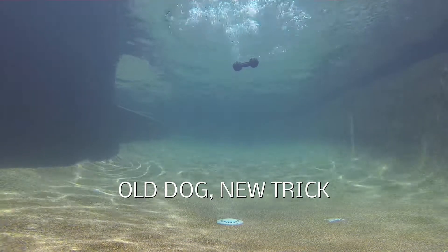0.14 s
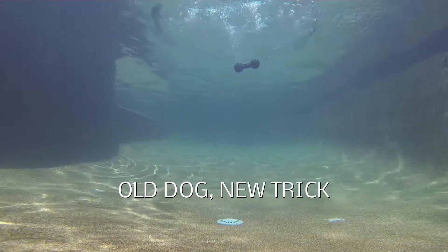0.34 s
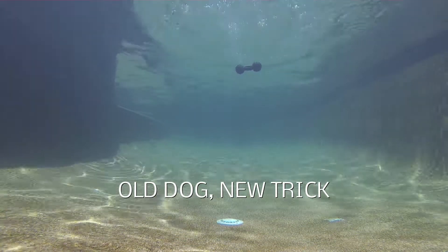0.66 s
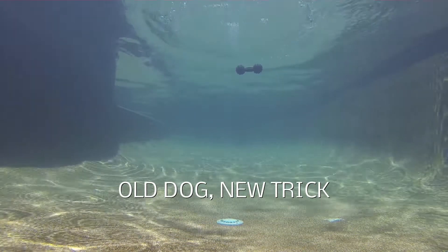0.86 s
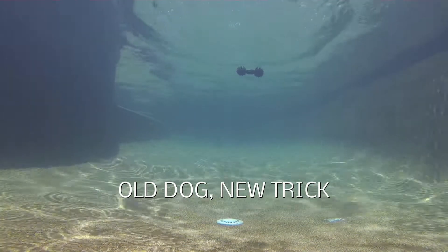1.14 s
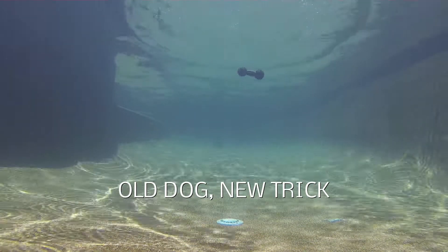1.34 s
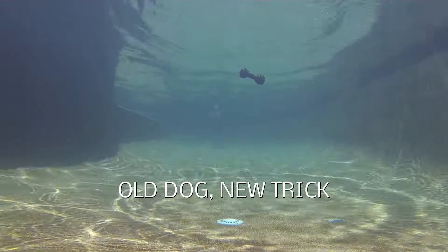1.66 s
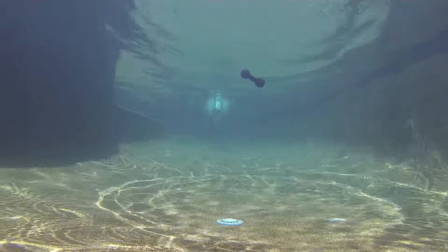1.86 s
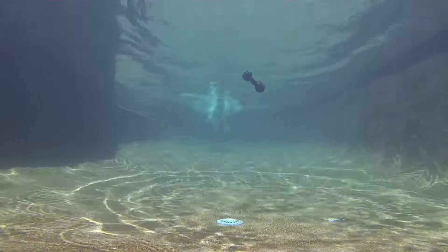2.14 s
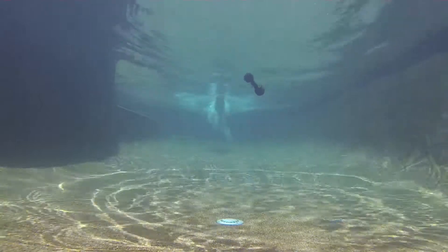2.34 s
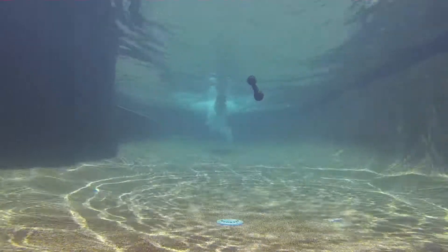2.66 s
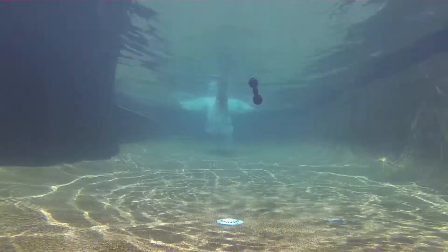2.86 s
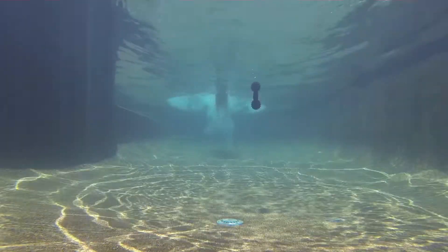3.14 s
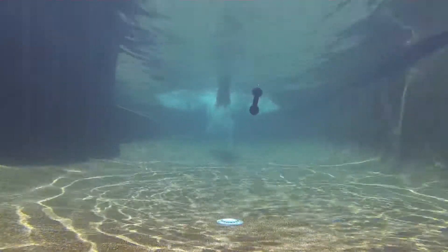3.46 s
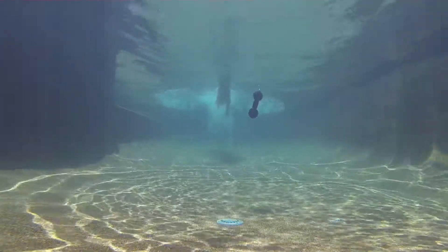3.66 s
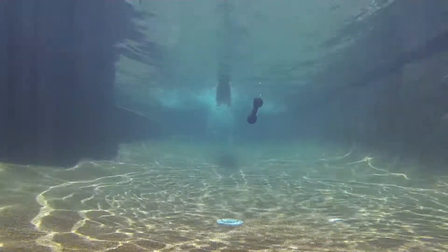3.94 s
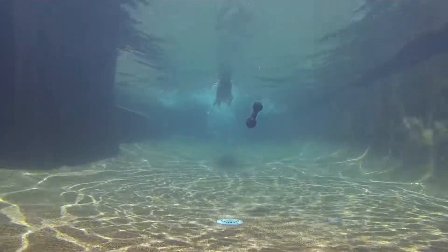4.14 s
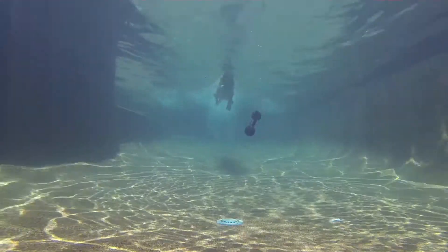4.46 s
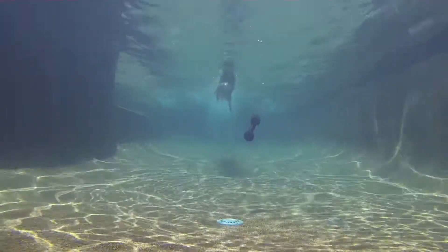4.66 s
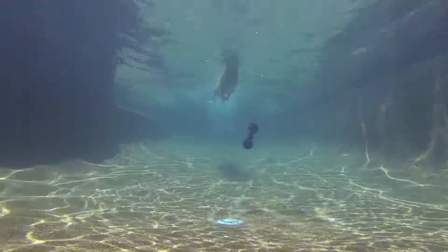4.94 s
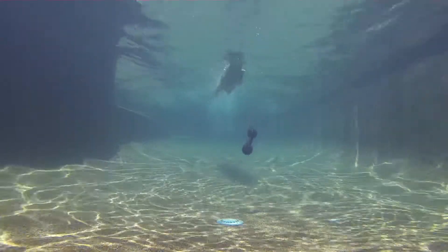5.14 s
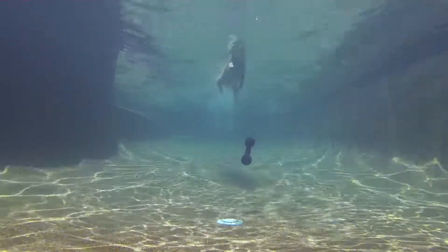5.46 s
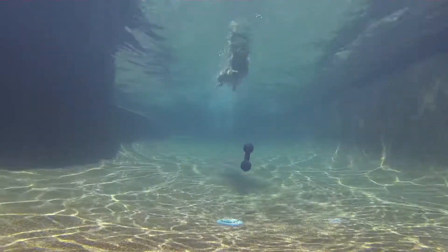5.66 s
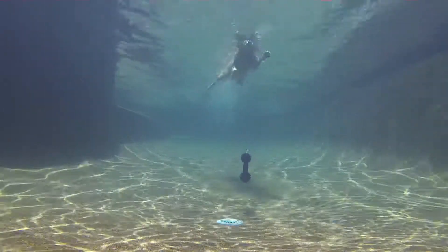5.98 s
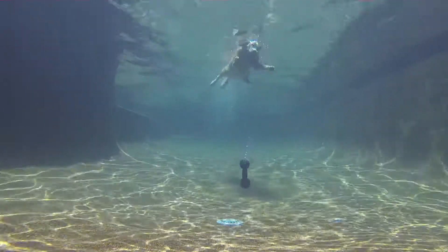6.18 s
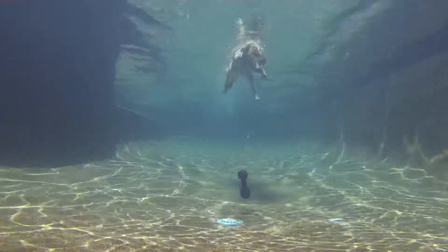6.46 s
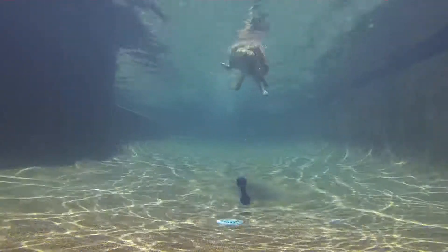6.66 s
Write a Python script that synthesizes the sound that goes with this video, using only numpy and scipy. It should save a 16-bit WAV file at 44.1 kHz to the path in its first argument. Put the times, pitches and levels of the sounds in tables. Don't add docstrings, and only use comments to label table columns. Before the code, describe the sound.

Underwater, a sinking toy lets out hollow glugs, then a dog plunges in with deep thumps, dense gurgling, and paddling bubbles that gradually thin out.

```python
import sys
import numpy as np
from scipy import signal
from scipy.fft import rfft, irfft
from scipy.io import wavfile

SR = 44100
rng = np.random.default_rng(int(sys.argv[2]) if len(sys.argv) > 2 else 0)


def store_wav(level_fs):
    pcm = np.round(np.clip(np.atleast_2d(level_fs), -1, 1) * 32767)
    wavfile.write(sys.argv[1], SR, pcm.T.astype(np.int16))


def amplitude_ratio(level_db):
    exponent = np.asarray(level_db, float) / 20
    return 10 ** exponent


N = 300321

# centre_hz, width_hz, level_db
HOUSING_MODES = [(544, 217, 0.5), (640, 121, 5.5), (751, 94, -4), (840, 78, -8), (1120, 340, -15),
                 (1660, 207, -0.5), (1820, 276, -7), (2350, 480, -16.5), (2850, 434, -17), (3400, 530, -18),
                 (4340, 960, -30.5), (5076, 660, -33), (6050, 1480, -38.5), (8240, 1000, -40.5),
                 (9420, 1040, -46), (11900, 8000, -50)]
SHELL_RING_HZ, SHELL_RING_WIDTH_HZ = 665, 76.5

# pitch_hz, density_db (per Hz)
HISS_COLOUR = [(239, -43), (378, -16), (683, -9.5), (1410, -14), (1700, -14.5), (9260, -28), (10900, -33),
               (15400, -29)]
# centre_hz, width_hz, boost_db
HISS_HUMPS = [(3254, 240, 13.5), (5280, 360, 10), (12900, 1000, 9), (10970, 280, 10.5)]
# pitch_hz, rms_db
WHINE_TONES = [(10643, -82), (10691, -89), (10740, -93), (10788, -95), (10837, -94), (13189, -89)]
HISS_DB = -68

# top_s (when the top is reached), slow_db, quick_db, hold_s
SURGES = [
    (0.0, -57.5, -47.5, 0.034),
    (0.22, -42.5, -55.5, 0.011),
    (1.298, -52, -70, 0.079),
    (1.532, -54, -54, 0.02),
    (1.75, -48.5, -61.5, 0.19),
    (1.977, -40.5, -49.5, 0.026),
    (2.127, -46, -44.5, 0.015),
    (2.216, -53.5, -53, 0.18),
    (2.44, -57.5, -59, 0.3),
    (2.81, -53.5, -59, 0.014),
]
SURGE_RISE_DB_PER_S, SURGE_FALL_DB_PER_S, CALM_SLOW_DB, CALM_QUICK_DB = 235, 124, -64, -66

# time_s, level_db
CLOUD_THICKNESS = [(0.0, -32), (0.05, -71.5), (0.14, -58), (0.49, -79), (1.31, -66.5), (1.675, -64.5),
                   (1.71, -52.5), (1.87, -37), (2.3, -30.5), (2.47, -33.5), (2.67, -38.5), (3.03, -41),
                   (3.83, -49), (4.34, -58), (5.18, -56.5), (5.5, -65), (6.05, -63.5), (6.81, -59.5)]
# peak_s, strength_db, froth_fineness_db, rise_db_per_s, fall_db_per_s
STROKES = [(0.0, -52, -12.5, 100, 247), (0.092, -41.5, -2.5, 387, 306), (0.228, -57, 4, 36, 101),
           (2.332, -42.5, -4.5, 71, 76), (2.762, -38, -6, 120, 47.5), (3.221, -44.5, -2, 35.5, 51.5),
           (3.618, -43.5, -3, 47.5, 50), (3.71, -59.5, 15, 90, 115), (3.951, -59, 0.5, 43, 66),
           (4.102, -47.5, 1.5, 43, 47.5), (4.42, -54, 0, 60, 49), (4.57, -61, 16, 81, 134),
           (4.969, -51.5, 4, 54.5, 74), (5.371, -54, 6, 86, 89), (5.668, -53, 2.5, 161, 51),
           (6.24, -57.5, -6, 70, 224.5)]
PLUNGE_S, PLUNGE_DB, PLUNGE_HOLD_S, PLUNGE_RISE_DB_PER_S, PLUNGE_FALL_DB_PER_S = 1.696, -43.5, 0.43, 498, 31
FRESH_DB, FRESH_S = 27, 0.37

# start_s, peak_db, pitch_hz
PLINKS = [(0.016, -36.5, 1810), (0.087, -28.5, 1730), (0.3312, -43, 1510), (1.037, -45.5, 1660),
          (1.28, -39, 1577), (1.8356, -34, 1820), (2.0665, -33, 1910), (2.4173, -32, 1690),
          (2.6316, -33, 1750), (2.702, -33, 1643), (2.713, -24.5, 1660), (2.8341, -28, 1820),
          (3.1899, -36, 1597), (3.345, -30, 1566), (3.527, -37.5, 1590), (3.572, -32.5, 1560),
          (3.629, -35, 1566), (3.671, -38.5, 1610), (3.7104, -29, 1660), (3.785, -41, 1620),
          (3.929, -46, 1690), (4.132, -34, 1528), (4.1866, -37, 1770), (4.325, -34.5, 1574),
          (4.629, -42.5, 1580), (5.661, -40, 1580), (5.884, -50.5, 1650), (6.5328, -35.5, 1880)]
# start_s, peak_db, pitch_hz
TINKLES = [(0.089, -32.5, 2660), (0.213, -44, 2350), (0.2346, -44, 2750), (0.379, -50, 2520),
           (1.556, -52, 3200), (1.697, -54, 2470), (1.827, -32, 2340), (2.0644, -33, 2550),
           (2.207, -31, 2850), (2.309, -25, 2510), (2.365, -27, 2360), (2.5983, -31, 2270),
           (2.7328, -21.5, 2320), (2.7728, -30, 2280), (3.1618, -30.5, 2180), (3.217, -32, 2330),
           (3.5472, -28.5, 2250), (4.0544, -33, 2300), (4.315, -34, 2280), (4.357, -36.5, 2710),
           (4.4087, -42, 2700), (5.0085, -42.5, 3360), (5.308, -47, 2870), (5.3665, -38.5, 2460),
           (5.5277, -43, 2230), (5.657, -30.5, 2350), (5.937, -43.5, 2310), (6.209, -39.5, 2210),
           (6.534, -36, 2100)]
# start_s, peak_db, pitch_hz, t60_s
BLIPS = [
    (0.176, -51.5, 1040, 0.11),
    (0.3336, -45.5, 984, 0.064),
    (3.4226, -49.5, 1004, 0.2),
    (6.1814, -50, 1020, 0.05),
]
PLINK_T60_S, TINKLE_T60_S = 0.056, 0.031

# start_s, peak_db, pitch_hz
SPECKS = [(0.071, -45, 4750), (0.1974, -52, 3740), (0.2723, -49, 4840), (0.2882, -53, 4600),
          (3.5538, -49.5, 3760), (3.669, -43, 3900), (3.9583, -47, 4340), (4.0472, -46, 4440),
          (4.119, -47, 4700), (4.2233, -50, 5000), (4.4802, -54, 4490), (4.5615, -60, 4550),
          (4.5855, -52, 4800), (4.6089, -51.5, 6430), (5.0928, -53.5, 4900), (5.362, -47, 3980),
          (5.5588, -55, 4540), (5.5742, -51.5, 6070), (5.6506, -48, 4200), (5.8282, -52, 4030),
          (5.8596, -53, 4030), (5.915, -54, 4320), (5.989, -50.5, 4600), (6.7805, -56, 4940)]
# start_s, peak_db, pitch_hz
PINGS = [(0.0692, -44.5, 2650), (0.3301, -49, 2420), (1.033, -51, 2420), (1.6415, -46, 2460),
         (1.7489, -34, 2230), (3.4311, -52, 2870), (3.454, -43, 2230), (3.5994, -41, 2110),
         (3.644, -35, 2290), (3.909, -35, 2640), (3.947, -35.5, 2260), (4.009, -39, 2820),
         (4.116, -36, 2180), (4.2218, -43, 2170), (4.429, -42, 2870), (4.491, -45, 3260),
         (4.783, -48, 2370), (4.8597, -43, 2860), (4.8898, -41.5, 3070), (4.9437, -39, 3300),
         (4.9594, -40, 3310), (5.017, -41, 2190), (5.049, -43, 3190), (5.255, -48, 2450),
         (5.319, -42, 2750), (5.562, -46.5, 2220), (5.6196, -47, 2350), (5.674, -37, 2230),
         (5.6944, -40, 2200), (5.7633, -48, 2270), (5.7822, -43, 2310), (5.9065, -44, 2180),
         (6.089, -51, 2730), (6.121, -46, 2730), (6.144, -45, 2430), (6.2647, -45.5, 2210),
         (6.626, -50.5, 3000)]
# start_s, peak_db, pitch_hz, t60_s
PLOPS = [(0.163, -38, 1580, 0.083), (0.384, -50, 1660, 0.04), (0.963, -57, 1680, 0.029),
         (1.345, -48, 1730, 0.04), (1.539, -43, 1610, 0.096), (2.1902, -28, 1950, 0.1),
         (2.9287, -33, 1770, 0.044), (3.1216, -27, 1670, 0.21), (3.5087, -33.5, 1660, 0.036),
         (3.5475, -38, 1640, 0.035), (3.6416, -24, 1660, 0.035), (3.7441, -31, 1720, 0.036),
         (3.852, -35, 1700, 0.047), (3.8707, -30, 1635, 0.032), (3.904, -35.5, 1600, 0.032),
         (4.4222, -42, 1620, 0.048), (4.6594, -42.5, 1750, 0.048), (4.7212, -49, 1860, 0.04),
         (4.786, -44.5, 1660, 0.06), (5.0634, -48, 1680, 0.04), (5.0973, -45, 1730, 0.04),
         (5.2285, -43, 1820, 0.037), (5.6244, -44.5, 1665, 0.1), (5.6515, -38, 1576, 0.032),
         (5.6897, -32, 1720, 0.023), (5.7014, -40, 1790, 0.043), (6.2657, -42, 1820, 0.03),
         (6.4136, -45, 1614, 0.04), (6.4572, -52, 1800, 0.037), (6.6537, -47, 1630, 0.023)]
# start_s, peak_db, pitch_hz, t60_s
BLOOPS = [(0.331, -46, 1100, 0.039), (0.418, -50, 1114, 0.067), (0.549, -56, 1120, 0.058),
          (1.038, -44, 816, 0.029), (1.278, -45, 1400, 0.031), (1.749, -41, 840, 0.032),
          (1.931, -48, 880, 0.05), (2.241, -51, 840, 0.05), (2.265, -39, 865, 0.05),
          (2.447, -30, 745, 0.066), (2.647, -35, 793, 0.05), (2.71, -43, 1085, 0.05),
          (4.192, -48, 1170, 0.086), (4.593, -55, 990, 0.059), (4.754, -52, 1000, 0.063),
          (5.521, -53, 1400, 0.048), (6.169, -47.5, 1194, 0.071), (6.662, -57, 1250, 0.057)]
# start_s, peak_db, pitch_hz, t60_s, crack_db
COMPANIONS = [
    (1.125, -50.5, 584, 0.032, -22),
    (1.76, -58, 756, 0.034, -30),
    (1.872, -25.5, 745, 0.098, -34),
    (1.89, -26, 745, 0.051, -25),
    (2.714, -35, 743, 0.038, -30),
    (5.718, -41, 590, 0.027, -33),
    (6.537, -26.5, 433, 0.078, -41),
    (6.537, -37, 670, 0.1, -45),
]
SPECK_T60_S, PING_T60_S = 0.031, 0.05

# start_s, peak_db, length_s
SNAPS = [(0.072, -78, 0.0061), (1.556, -56, 0.011), (1.697, -50.5, 0.012), (1.745, -49.5, 0.01),
         (2.555, -55, 0.022), (4.12, -60, 0.0086), (5.672, -66, 0.011), (2.731, -51.5, 0.0034),
         (3.202, -60, 0.0022), (3.884, -56.5, 0.0038), (5.325, -73, 0.0027), (5.877, -62, 0.0025)]

# start_s, peak_db, pitch_hz, t60_s, crack_db (of the pinch-off)
TOY_GLUGS = [(0.087, -27.5, 512, 0.042, -14.5), (0.282, -27.5, 595, 0.041, -44.5),
             (0.33, -26, 588, 0.042, -36), (0.395, -33.5, 615, 0.053, -18),
             (0.418, -30.5, 593, 0.046, -17.5), (0.444, -38, 604, 0.058, -40),
             (0.544, -35, 553, 0.025, -18), (0.556, -30.5, 586, 0.039, -40), (0.67, -35, 582, 0.037, -46),
             (0.725, -34.5, 574, 0.03, -42), (0.963, -40.5, 717, 0.093, -8),
             (1.036, -32.5, 610, 0.043, -20), (1.277, -19, 590, 0.032, -29.5),
             (1.3645, -26.5, 578, 0.028, -33), (1.492, -39, 585, 0.053, -16), (1.514, -31, 620, 0.054, -14)]

# start_s, peak_db, first_pitch_hz, last_pitch_hz, t60_s
THUMPS = [(0.202, -33.5, 163, 61, 0.032), (0.56, -54, 189, 90, 0.12), (0.71, -52.5, 197, 90, 0.15),
          (1.282, -35.5, 290, 98, 0.027), (1.371, -44.5, 250, 110, 0.058), (1.75, -38.5, 62, 52, 0.14),
          (1.752, -36.5, 274, 100, 0.023), (1.92, -43, 196, 160, 0.23), (2.115, -36, 170, 169.4, 0.2),
          (2.122, -31, 58, 55, 0.37), (2.188, -33, 82, 76.4, 0.55), (2.335, -39, 75, 72.05, 0.46),
          (2.8, -46.5, 210.6, 198, 0.24), (3.921, -40, 430, 330, 0.032)]

# start_s, peak_db, pitch_hz, crack_db
PLUNGE_GLUGS = [(1.696, -37, 690, -25), (2.041, -24.5, 640, -18.5), (2.113, -19, 706, -4.5),
                (2.302, -13.5, 608, -39), (2.556, -12.5, 627, -53), (2.649, -13, 710, -37.5),
                (2.684, -24.5, 576, -22), (2.741, -25, 613, -34), (2.792, -20, 592, -27),
                (2.986, -21.5, 665, -15), (3.091, -22.5, 635, -16), (3.137, -21.5, 660, -44),
                (3.189, -21, 640, -41), (3.247, -24.5, 627, 3)]
# start_s, peak_db, pitch_hz
PADDLE_GLUGS = [(3.352, -26, 557), (3.428, -29.5, 540), (3.459, -27, 558), (3.555, -28.5, 552),
                (3.642, -23.5, 607), (3.738, -28, 634), (3.921, -24.5, 634), (3.972, -35, 585),
                (4.025, -31, 650), (4.118, -24.5, 524), (4.187, -32, 504), (4.308, -29, 570),
                (4.412, -33.5, 593), (4.445, -33.5, 660), (4.593, -29, 520), (4.881, -36.5, 640),
                (5.017, -31.5, 542), (5.117, -42, 530), (5.383, -40, 560), (5.462, -35, 630),
                (5.671, -30, 665), (5.737, -30.5, 513), (5.819, -26.5, 592), (6.14, -34, 615),
                (6.418, -29, 687), (6.442, -29.5, 579), (6.534, -27.5, 528), (6.655, -28.5, 514)]
# start_s, peak_db, pitch_hz, t60_s, crack_db
FOLLOWERS = [(1.744, -32, 640, 0.039, -43), (2.333, -16, 522, 0.024, -26), (2.661, -35, 513, 0.032, -28),
             (3.812, -31.5, 518, 0.029, -22), (4.132, -29, 598, 0.034, -26), (4.14, -35, 449, 0.17, -26),
             (4.632, -32.5, 665, 0.049, -5), (4.723, -37.5, 473, 0.12, -6), (5.029, -38, 536, 0.091, -35),
             (5.749, -25, 617, 0.055, -44), (6.264, -40.5, 483, 0.042, -29), (6.549, -37.5, 497, 0.042, 2),
             (6.693, -48, 510, 0.046, -28.5), (6.799, -42, 700, 0.076, -3)]
PADDLE_CRACK_DB, RING_S_AT_600_HZ, RING_POWER = -21, 0.047, 4.7

STRING_COUNT, STRING_S, STRING_GAP_S = 6, 5.891, 0.0698
STRING_DB, STRING_FADE_DB, STRING_HZ, STRING_SAG_HZ, STRING_T60_S, STRING_CRACK_DB = -28, 0.7, 551, 4.6, 0.029, -58
STRING_TAIL_DB, STRING_TAIL_T60_S = -36.5, 0.099
STRING_PUFF_DB, STRING_PUFF_HZ, STRING_PUFF_T60_S = -46.5, 356, 0.035


def rms_one(x):
    return x / np.sqrt(np.mean(x ** 2) + 1e-20)


def in_time(rows):
    s, *columns = np.transpose(rows)
    return [np.interp(np.arange(N) / SR, s, c) for c in columns]


def drift(rate):
    r = np.exp(-80 * np.pi * rate / SR)
    slow = signal.lfilter([1], [1, -2 * r, r * r], rng.standard_normal(N // 40 + 2002))[2000:]
    return np.interp(np.arange(N) / 40, np.arange(len(slow)), rms_one(slow))


def resonance(x, hz, width):
    r = np.exp(-np.pi * width / SR)
    feedback = [1, -2 * r * np.cos(2 * np.pi * hz / SR), r * r]
    return signal.lfilter(np.array([1, 0, -1]) * (1 - r * r) / 2, feedback, x)


def band(x, low_hz, high_hz, order=2):
    return signal.sosfilt(signal.butter(order, [low_hz, high_hz], "band", fs=SR, output="sos"), x)


def place(table, shapes, trim_db):
    out = np.zeros(N + shapes.shape[1])
    for row, shape in zip(table, shapes):
        at = round(row[0] * SR)
        out[at:at + len(shape)] += amplitude_ratio(row[1] + trim_db) * shape / np.abs(shape).max()
    return out[:N]


def with_t60(table, t60_s):
    return [(*row, t60_s) for row in table]


def swell(s, db, rise_db_per_s, hold_s, fall_db_per_s):
    t = np.arange(0, N, 64) / SR - s
    return db + rise_db_per_s * np.minimum(t, 0) - fall_db_per_s * np.maximum(t - hold_s, 0)


def together(levels_db):
    total_db = 10 * np.log10(sum(amplitude_ratio(np.maximum(db, -200)) ** 2 for db in levels_db))
    return np.interp(np.arange(N) / 64, np.arange(len(total_db)), total_db)


def housing_response():
    click = np.zeros(2048)
    click[0] = 1
    return sum((-1) ** k * amplitude_ratio(db) * resonance(resonance(click, hz, width), hz, width)
               for k, (hz, width, db) in enumerate(HOUSING_MODES))


def camera():
    hz = np.fft.rfftfreq(N, 1 / SR) + 1
    points = np.array(HISS_COLOUR)
    gain = amplitude_ratio(np.interp(np.log(hz), np.log(points[:, 0]), points[:, 1])) * (hz > 300)
    for centre, width, db in HISS_HUMPS:
        gain = gain * amplitude_ratio(db / (1 + (2 * (hz - centre) / width) ** 2))
    hiss = rms_one(irfft(rfft(rng.standard_normal(N)) * gain, N))
    t = np.arange(N) / SR + np.cumsum(0.000278 * drift(2.34)) / SR
    whine = sum(amplitude_ratio(db + 4) * np.sin(2 * np.pi * (f * t + rng.random())) for f, db in WHINE_TONES)
    return amplitude_ratio(HISS_DB + 2) * hiss + whine


def surge_level(column, calm_db):
    swells = [swell(row[0], row[column], SURGE_RISE_DB_PER_S, row[3], SURGE_FALL_DB_PER_S) for row in SURGES]
    return together([calm_db] + swells)


def surge():
    slow_db = surge_level(1, CALM_SLOW_DB)
    quick_db = surge_level(2, CALM_QUICK_DB) + 1.53 * drift(11.0)
    rock, quick, rumble = rng.standard_normal((3, N))
    rock = rms_one(resonance(resonance(rock, 49.5, 57), 49.5, 57))
    rumble = rms_one(band(rumble, 22, 53))
    quick = rms_one(band(quick, 93.0, 315))
    return amplitude_ratio(slow_db) * rock + (amplitude_ratio(-67.0) + amplitude_ratio(slow_db - 14)) * rumble + amplitude_ratio(quick_db) * quick


def churn(cloud_db, plunge_db, stroke_db, fine_share, calm_db):
    strokes = [swell(s, db + stroke_db + fine_share * fine_db, rise, 0, fall)
               for s, db, fine_db, rise, fall in STROKES]
    plunge = swell(PLUNGE_S, PLUNGE_DB + plunge_db, PLUNGE_RISE_DB_PER_S, PLUNGE_HOLD_S, PLUNGE_FALL_DB_PER_S)
    return together(strokes + [plunge, cloud_db[::64], calm_db])


def foam_levels():
    thick_db, = in_time(CLOUD_THICKNESS)
    middle_db = -49.0 + 1.2 * (thick_db + 39.5)
    small_db = -54.5 + 1.3 * (thick_db + 40.5)
    mist_db = -61.5 + 0.76 * (thick_db + 41.0)
    return (churn(thick_db, plunge_db=-9.5, stroke_db=-3.0, fine_share=-0.72, calm_db=-71),
            churn(middle_db, plunge_db=-4.0, stroke_db=-4.5, fine_share=-1.1, calm_db=-81.0),
            churn(small_db, plunge_db=-3.0, stroke_db=-2.0, fine_share=0, calm_db=-81.5),
            churn(mist_db, plunge_db=-12.5, stroke_db=-12.5, fine_share=0.91, calm_db=-80.5))


def cloud(shell, level_db, bright_db, low_hz, high_hz, per_s, cycles, spread_db, clump_db):
    rate = per_s * amplitude_ratio(.7 * (level_db - level_db.max()))
    sizes = amplitude_ratio(spread_db * np.minimum(rng.exponential(1, N), 4)) * rng.choice([-1, 1], N) / np.sqrt(rate)
    born = sizes * (rng.random(N) < rate / SR) * amplitude_ratio(clump_db * drift(17.0))
    born = born + amplitude_ratio(-55.5) * rng.standard_normal(N)
    dealt = rng.integers(0, 12, N)
    out = 0
    for k, hz in enumerate(np.geomspace(low_hz, high_hz, 12)):
        struck = amplitude_ratio(bright_db * (k / 11 - .5)) * born * (dealt == k) + 1e-18
        soft_start = resonance(struck, hz, 17.0 * hz / cycles)
        out = out + resonance(soft_start, hz, 0.86 * hz / cycles)
    return amplitude_ratio(level_db) * rms_one(signal.fftconvolve(out, shell)[:N])


def foam(shell):
    large_db, middle_db, small_db, mist_db = foam_levels()
    since = np.arange(N) / SR - PLUNGE_S
    fresh_db = FRESH_DB * np.exp(-np.abs(since) / FRESH_S) * (since > -.05)
    large = cloud(shell, large_db, 0.97 * (large_db + 43.0) + fresh_db, 460.0, 938,
                  per_s=3600, cycles=10.3, spread_db=2.5, clump_db=1.66)
    middle = cloud(shell, middle_db, 0, 1022, 1928, per_s=2600, cycles=22.0, spread_db=0.5, clump_db=2.5)
    small = cloud(shell, small_db, mist_db - small_db + 1.5, 2133, 3727,
                  per_s=2600, cycles=34.0, spread_db=2.5, clump_db=0.5)
    mist = cloud(shell, mist_db, 0, 4120, 17300, per_s=8300, cycles=10.3, spread_db=0.7, clump_db=1.0)
    rush = rms_one(band(rng.standard_normal(N), 670, 1200))
    rush_db = -54 + 0.27 * (mist_db + 52.5) + 0.67 * (large_db + 31.5)
    return large + middle + small + band(mist, 3840, 20500) + amplitude_ratio(rush_db) * rush


def bubbles(table, shell, rise, trim_db):
    t = np.arange(6000) / SR
    hz, t60 = np.array(table)[:, 2:3], np.array(table)[:, 3:4]
    rings = amplitude_ratio(-60 * t / t60) * np.sin(2 * np.pi * hz * t * (1 + rise * t))
    froth = 0.63 * rng.standard_normal(rings.shape) * amplitude_ratio(-75 * t / t60)
    soft_start = (1 - np.exp(-t / 0.00037)) ** 2
    rings = (rings + band(froth, 1.55 * hz.min(), 1.5 * hz.max())) * soft_start
    return place(table, signal.fftconvolve(rings, shell[None], axes=1), trim_db)


def small_bubbles(shell):
    return (bubbles(with_t60(PLINKS, PLINK_T60_S), shell, rise=0.86, trim_db=1.5)
            + bubbles(with_t60(TINKLES, TINKLE_T60_S), shell, rise=0.072, trim_db=-1.0)
            + bubbles(BLIPS, shell, rise=0.58, trim_db=8.5))


def droplets(table, attack_s, rise, ragged_hz, ragged, trim_db):
    t = np.arange(4000) / SR
    hz, t60 = np.array(table)[:, 2:3], np.array(table)[:, 3:4]
    flutter = 1 + ragged * rms_one(band(rng.standard_normal((len(table), len(t))), 32, ragged_hz))
    envelope = amplitude_ratio(-60 * t / t60) * (1 - np.exp(-t / attack_s)) ** 2
    rings = envelope * flutter * np.sin(2 * np.pi * hz * t * (1 + rise * t))
    return place(table, rings, trim_db)


def strays(shell):
    times = [STRING_S + k * STRING_GAP_S for k in range(STRING_COUNT)]
    puffs = [(s, STRING_PUFF_DB, STRING_PUFF_HZ, STRING_PUFF_T60_S) for s in times]
    tails = [(s, STRING_TAIL_DB, STRING_HZ - k * STRING_SAG_HZ, STRING_TAIL_T60_S) for k, s in enumerate(times)]
    specks, pings = with_t60(SPECKS, SPECK_T60_S), with_t60(PINGS, PING_T60_S)
    return (droplets(specks, attack_s=0.00057, rise=2.8, ragged_hz=700, ragged=0.65, trim_db=-2.0)
            + droplets(pings, attack_s=0.0008, rise=1.2, ragged_hz=397, ragged=0.73, trim_db=-1.5)
            + droplets(PLOPS, attack_s=0.0013, rise=0.43, ragged_hz=250, ragged=0.2, trim_db=-5.0)
            + droplets(BLOOPS, attack_s=0.00084, rise=0.74, ragged_hz=357, ragged=1.0, trim_db=4.0)
            + glugs(COMPANIONS, shell, swell_s=0.0049, scoop=0.17, beat_db=2, push_db=-36, push_hz=320)
            + droplets(puffs + tails, attack_s=0.00063, rise=0, ragged_hz=100, ragged=0.3, trim_db=0))


def snaps(shell):
    t = np.arange(2000) / SR
    bursts = rng.standard_normal((len(SNAPS), len(t))) * np.exp(-t / np.array(SNAPS)[:, 2:3])
    return place(SNAPS, band(signal.fftconvolve(bursts, shell[None], axes=1), 3400, 13300), trim_db=15.5)


def glugs(table, shell, swell_s, scoop, beat_db, push_db, push_hz):
    t = np.arange(6000) / SR
    hz, t60, crack_db = np.array(table)[:, 2:, None].transpose(1, 0, 2)
    onset = (1 - np.exp(-t / swell_s)) ** 2
    sag = scoop * np.exp(-t / 0.0011)
    pitch = hz * (1 + 0.92 * t - sag)
    ring = amplitude_ratio(-60 * t / t60) * np.sin(2 * np.pi * np.cumsum(pitch, axis=1) / SR) * onset

    shell_hz = SHELL_RING_HZ + 15 * rng.standard_normal((len(table), 1))
    shell_tone = np.sin(2 * np.pi * shell_hz * np.cumsum(1 - sag) / SR)
    beat = np.exp(-np.pi * SHELL_RING_WIDTH_HZ * t) * shell_tone * onset
    uneven = amplitude_ratio(2.5 * rng.standard_normal((len(table), 1)))
    push = np.exp(-t / 0.0031) * np.sin(2 * np.pi * push_hz * t)

    rattle = rng.standard_normal((len(table), len(t))) * np.exp(-t / 0.028)
    crack = band(signal.fftconvolve(rattle, shell[None], axes=1)[:, :len(t)], 480, 8600)
    crack = crack / np.max(np.abs(crack), axis=1, keepdims=True)

    gargle = band(rng.standard_normal(ring.shape), 441, 650, order=3)
    gargle = gargle * amplitude_ratio(-42 * t / t60) * (1 - np.exp(-t / 0.006))
    body = band(ring + 1.7 * gargle + amplitude_ratio(beat_db) * uneven * beat + amplitude_ratio(push_db) * push, 120, 2900)
    return place(table, body + amplitude_ratio(crack_db) * crack, trim_db=-4.0)


def toy_glugs(shell):
    return glugs(TOY_GLUGS, shell, swell_s=0.0024, scoop=0.3, beat_db=-10.0, push_db=-15, push_hz=416)


def thumps():
    t = np.arange(15000) / SR
    first, last, t60 = np.array(THUMPS)[:, 2:, None].transpose(1, 0, 2)
    hz = last + (first - last) * np.exp(-t / 0.044)
    swings = np.sin(2 * np.pi * np.cumsum(hz, axis=1) / SR) * amplitude_ratio(-60 * t / t60) * (1 - np.exp(-t / 0.0029))
    return place(THUMPS, swings, trim_db=0.5)


def dog_glugs(shell):
    rows = PLUNGE_GLUGS + [(*row, PADDLE_CRACK_DB) for row in PADDLE_GLUGS]
    singles = [(s, db, hz, RING_S_AT_600_HZ * (600 / hz) ** RING_POWER, crack_db) for s, db, hz, crack_db in rows]
    string = [(STRING_S + k * STRING_GAP_S, STRING_DB - k * STRING_FADE_DB, STRING_HZ - k * STRING_SAG_HZ,
               STRING_T60_S, STRING_CRACK_DB) for k in range(STRING_COUNT)]
    return glugs(singles + string + FOLLOWERS, shell,
                 swell_s=0.002, scoop=0.43, beat_db=-4, push_db=-27.5, push_hz=320)


def scene():
    shell = housing_response()
    water = foam(shell) + small_bubbles(shell) + strays(shell) + snaps(shell)
    large = toy_glugs(shell) + dog_glugs(shell)
    return (camera() + surge() + water + large + thumps())[None]


def band_limit(x):
    return signal.sosfilt(signal.butter(12, 15330, fs=SR, output="sos"), x)


def record(dry):
    cut = signal.sosfilt(signal.cheby2(16, 70, 16150, fs=SR, output="sos"), dry)
    return band_limit(cut)


dry = scene()
out = record(dry)
store_wav(out)
```